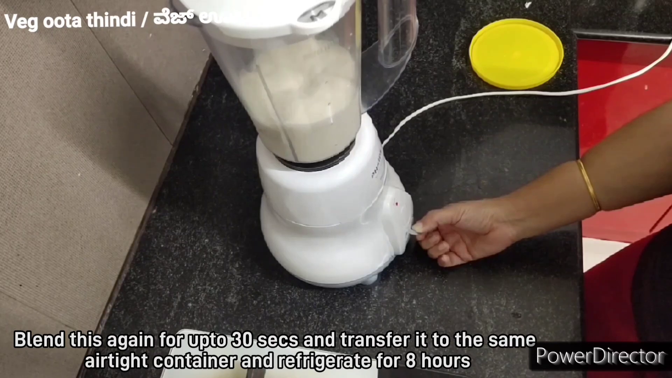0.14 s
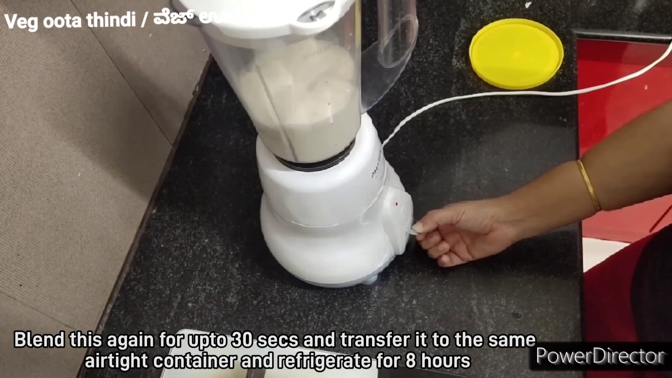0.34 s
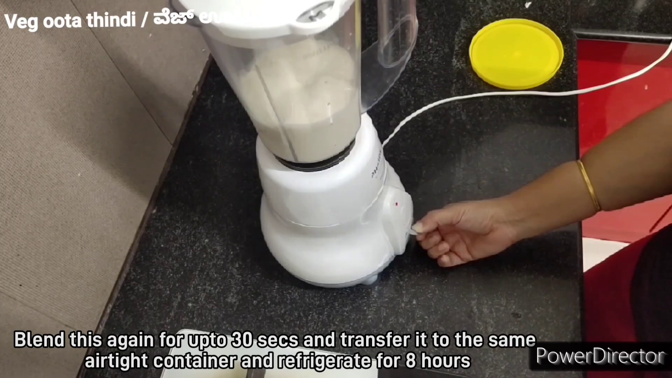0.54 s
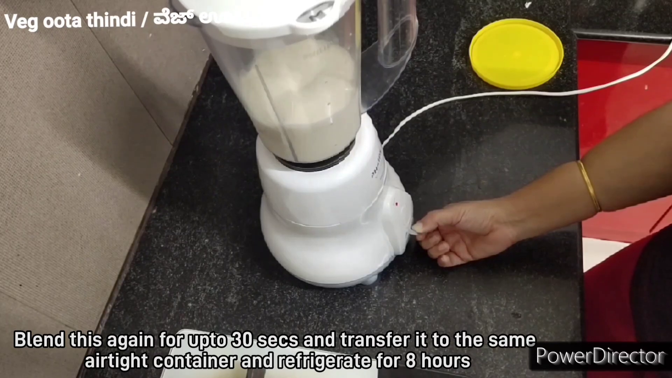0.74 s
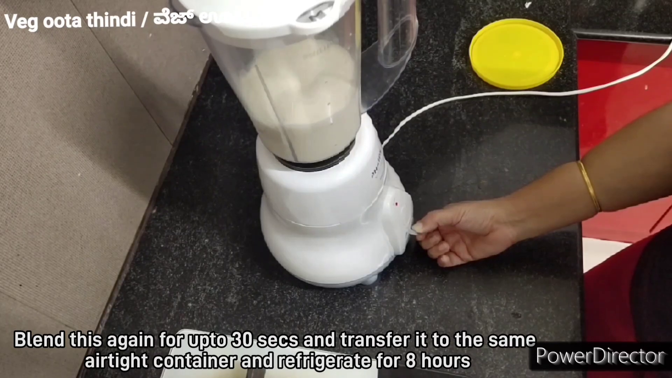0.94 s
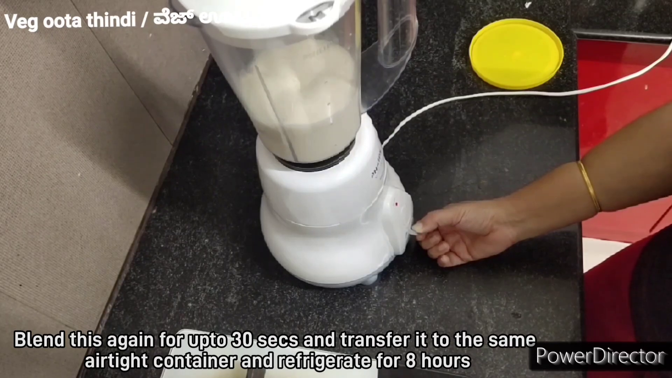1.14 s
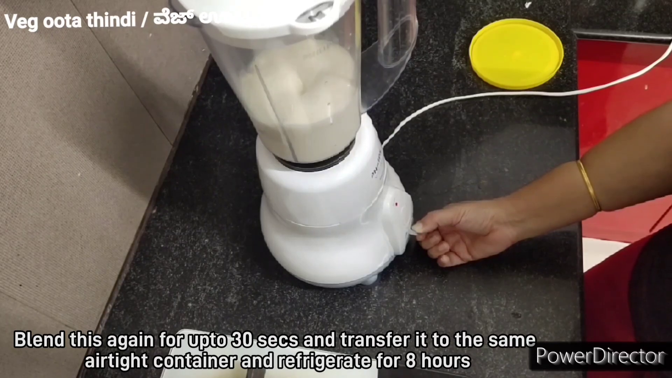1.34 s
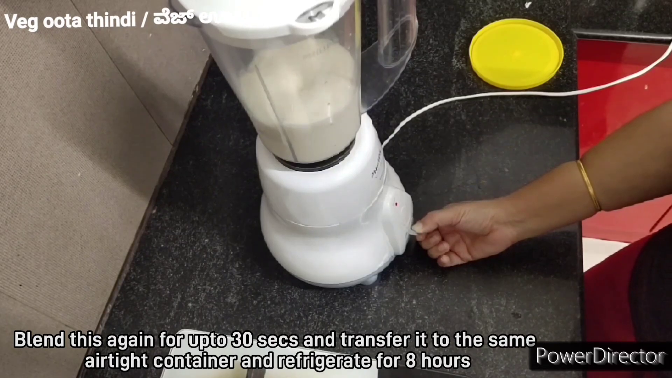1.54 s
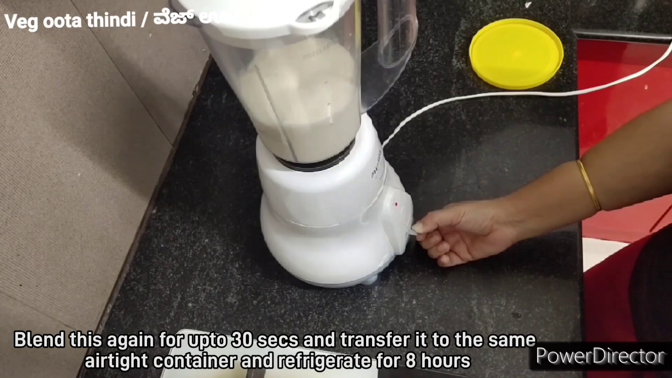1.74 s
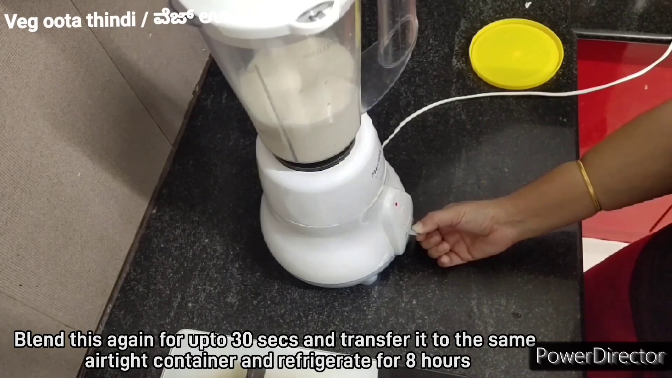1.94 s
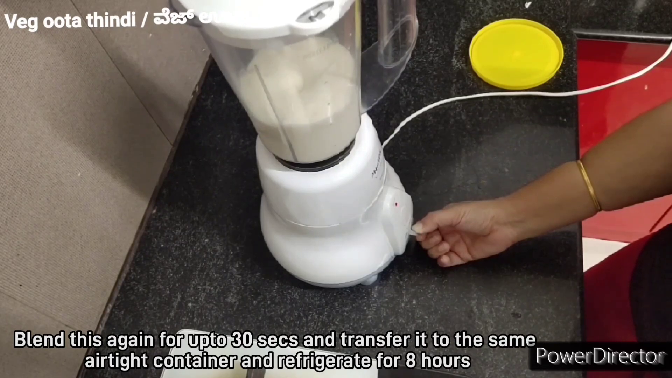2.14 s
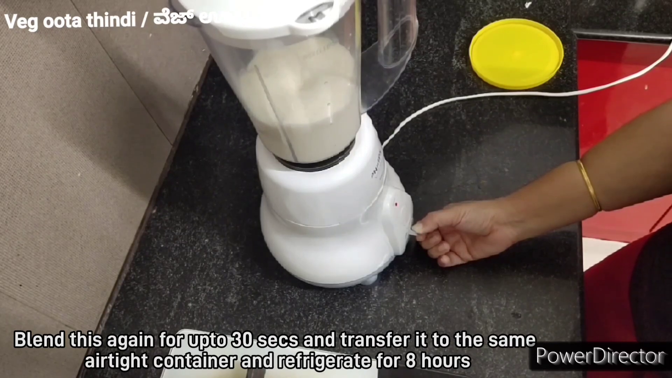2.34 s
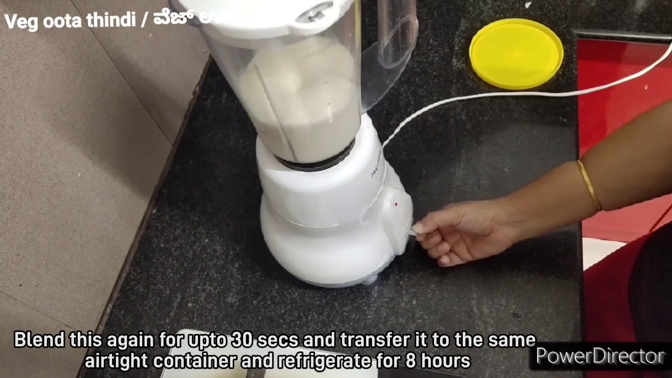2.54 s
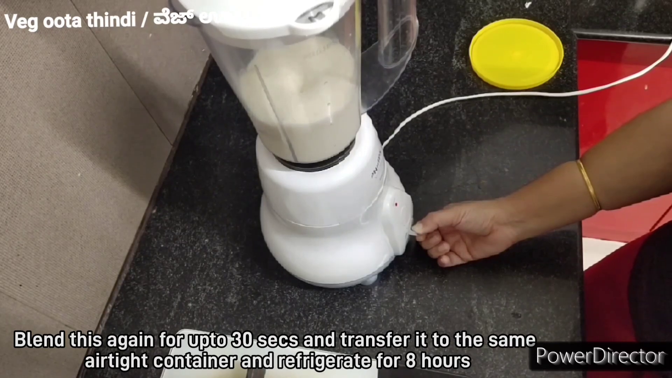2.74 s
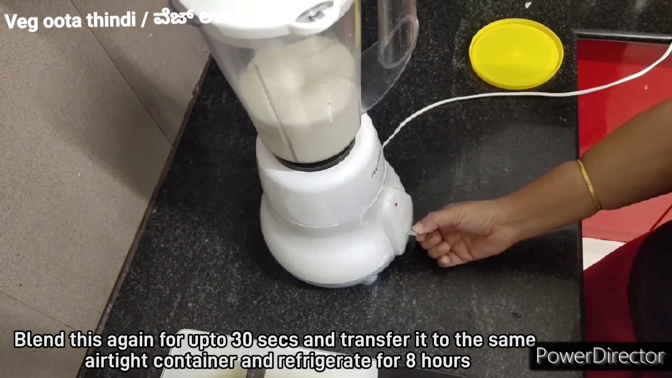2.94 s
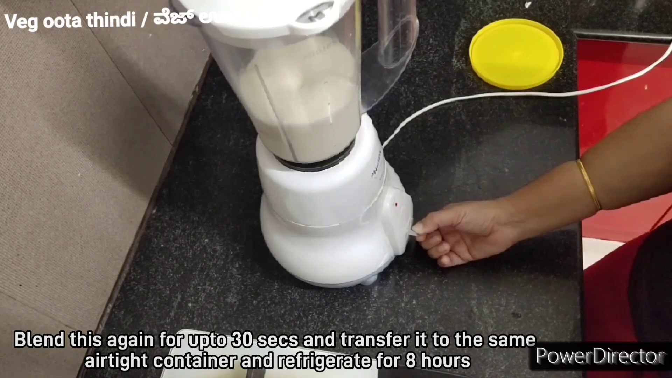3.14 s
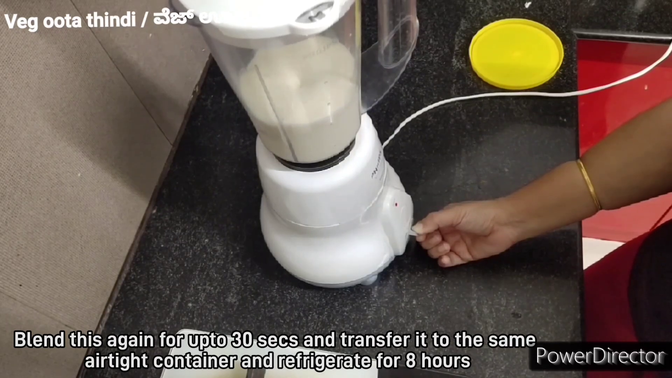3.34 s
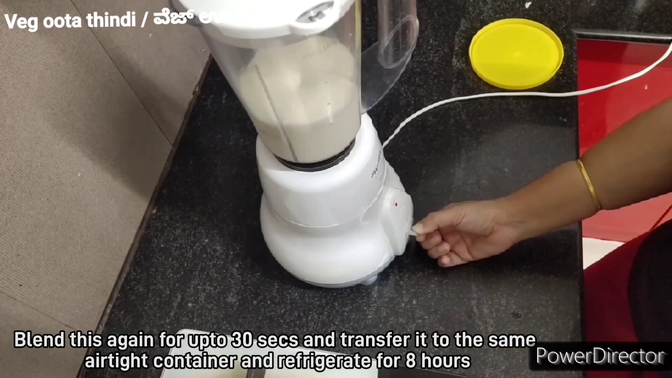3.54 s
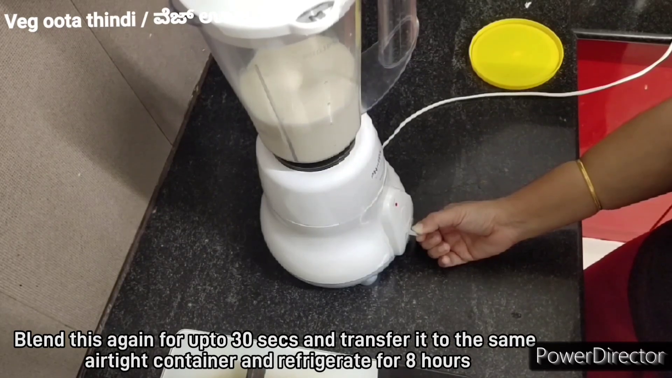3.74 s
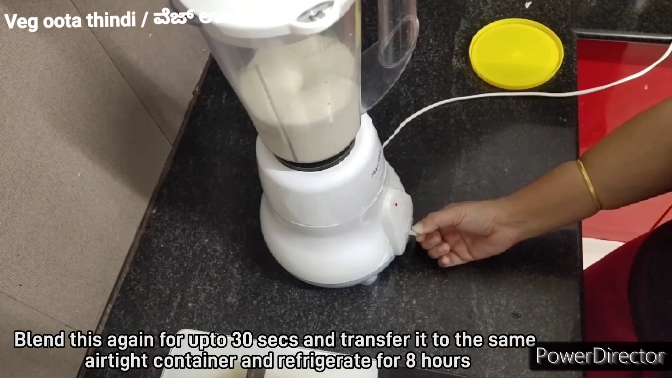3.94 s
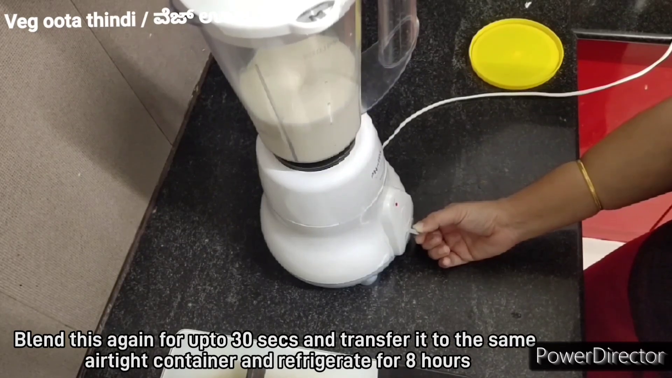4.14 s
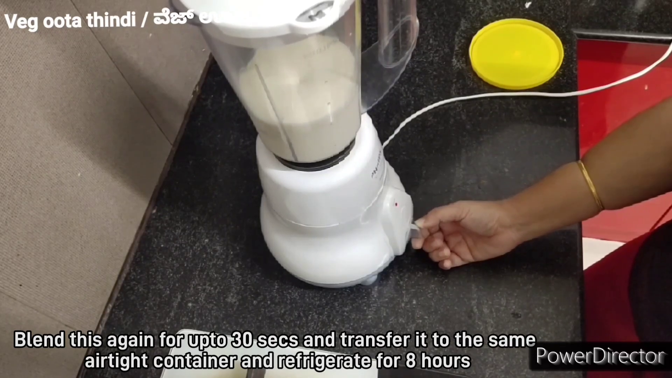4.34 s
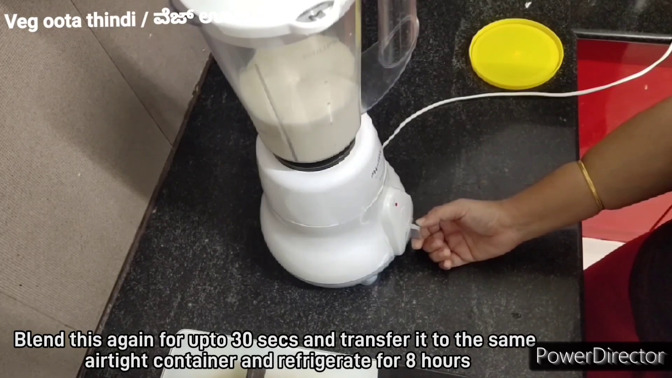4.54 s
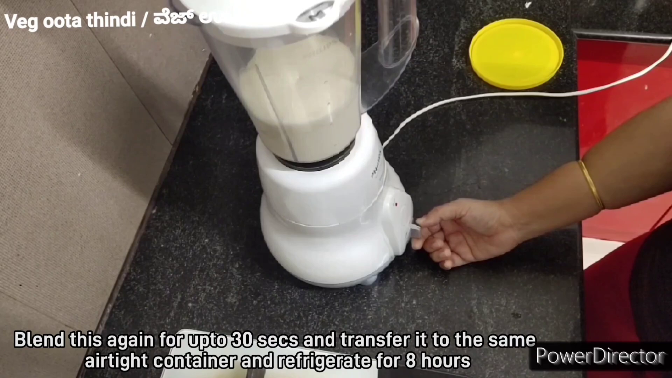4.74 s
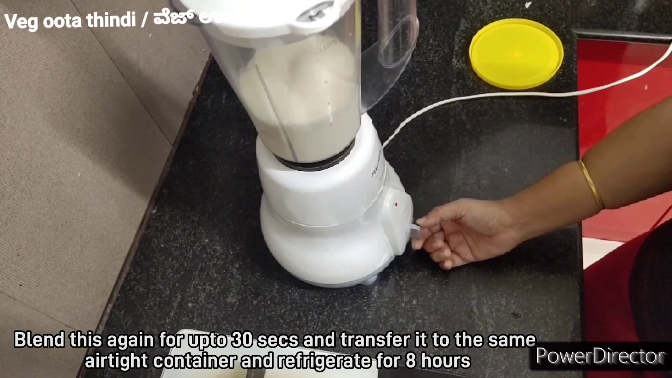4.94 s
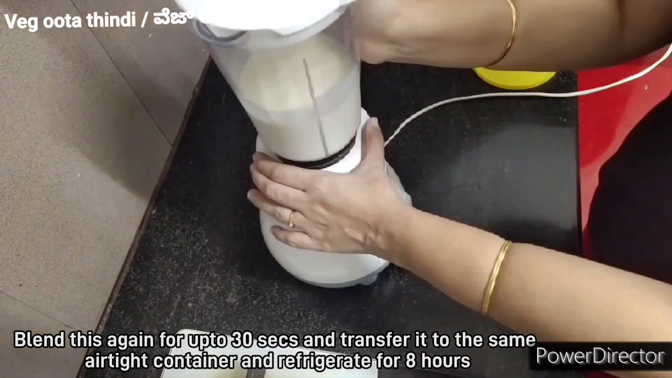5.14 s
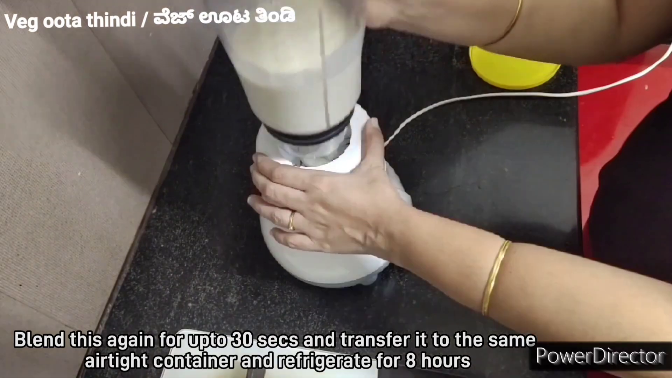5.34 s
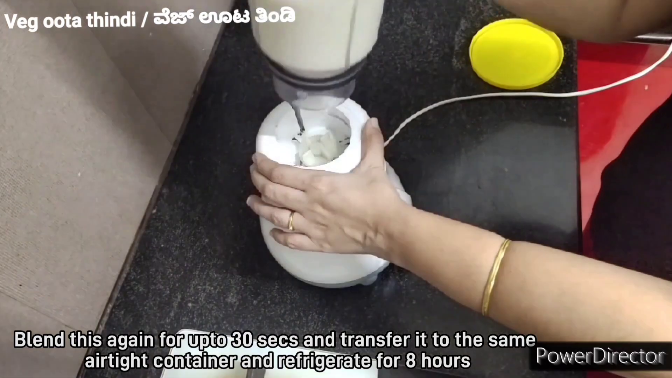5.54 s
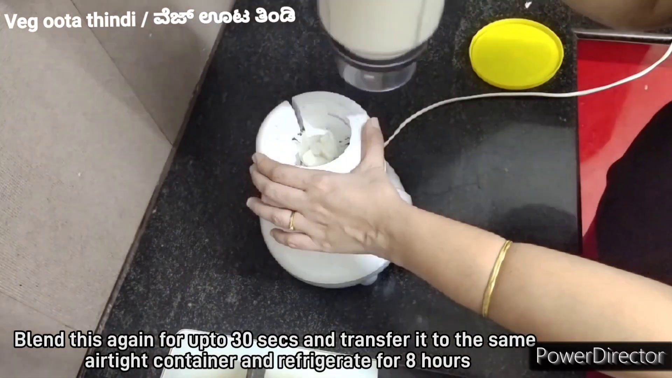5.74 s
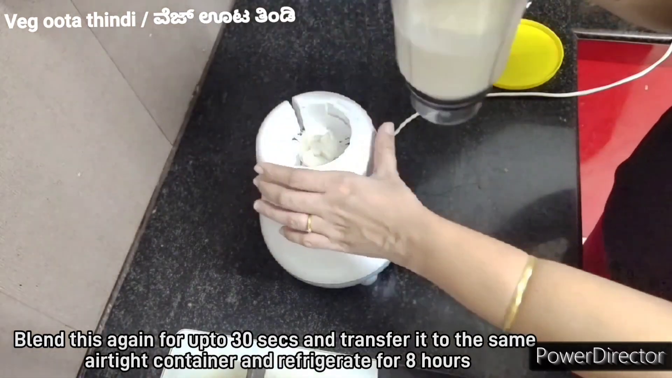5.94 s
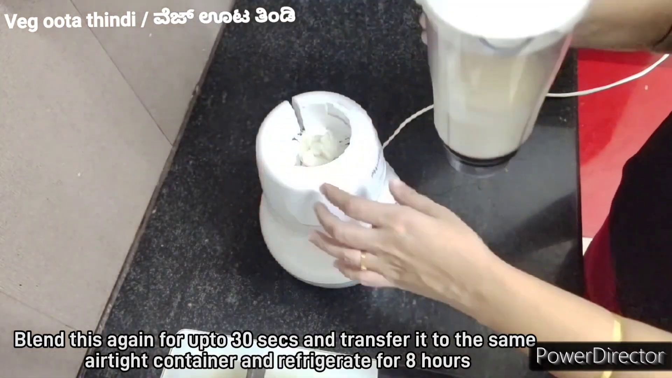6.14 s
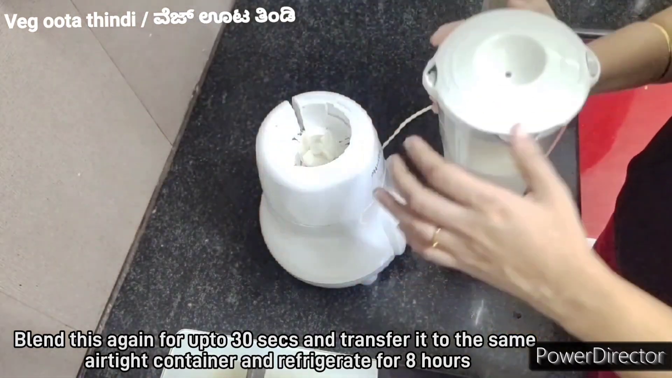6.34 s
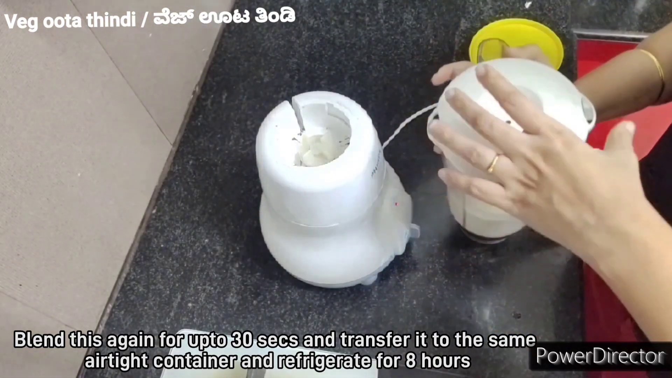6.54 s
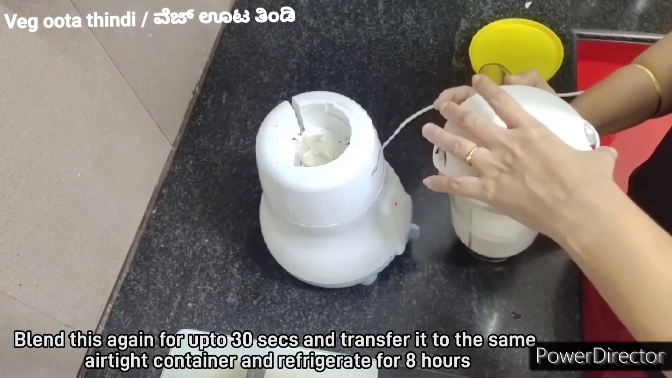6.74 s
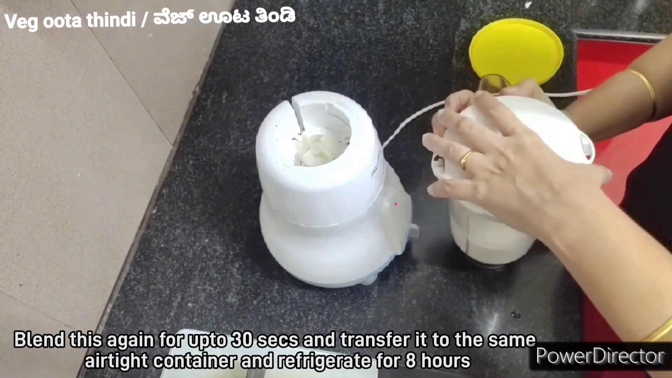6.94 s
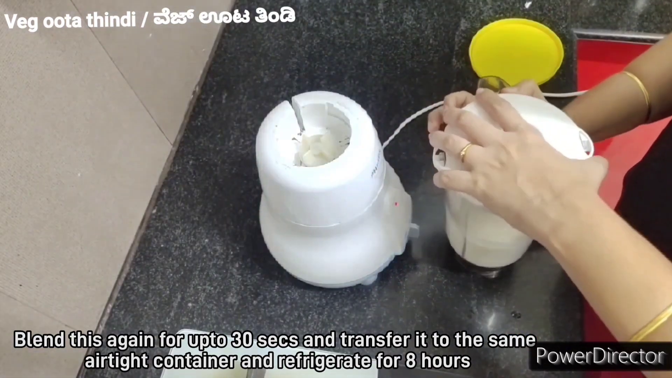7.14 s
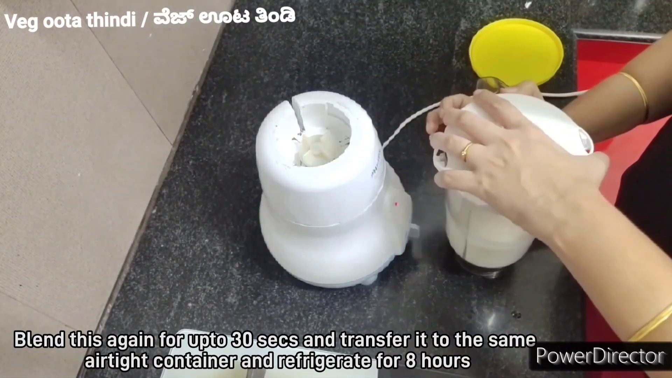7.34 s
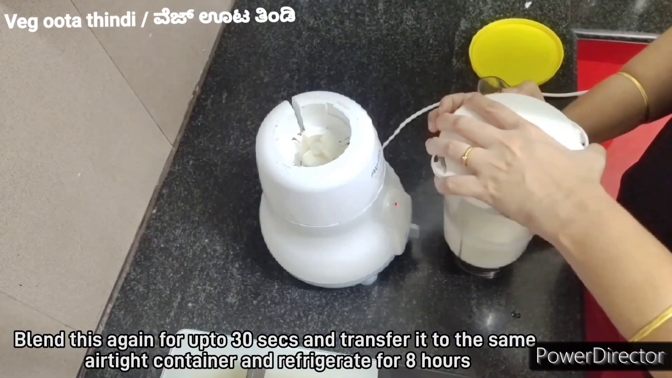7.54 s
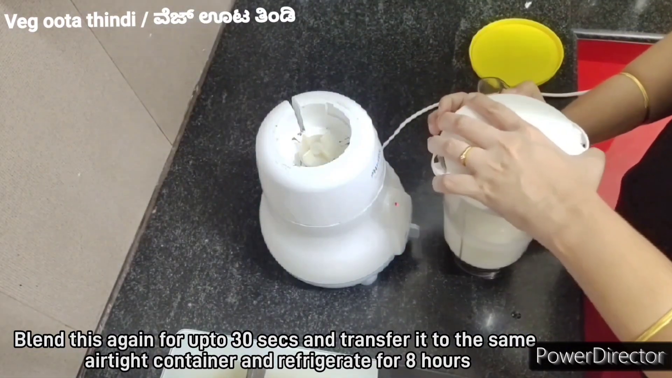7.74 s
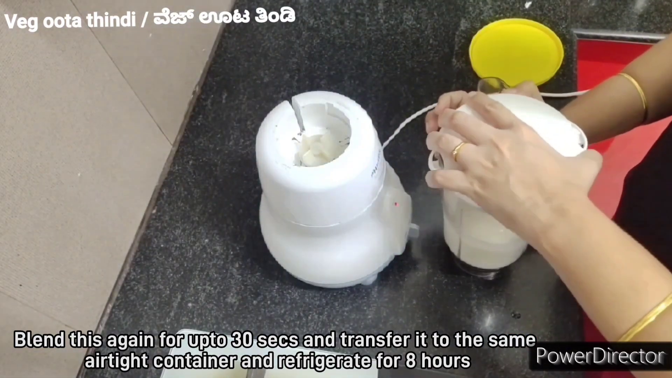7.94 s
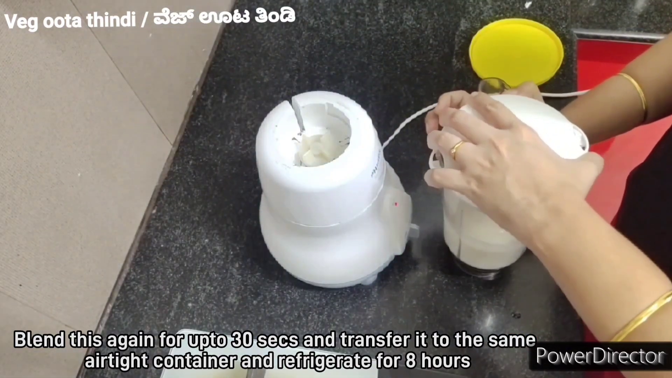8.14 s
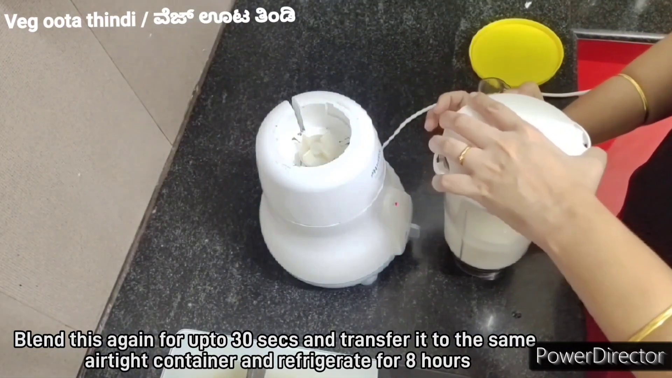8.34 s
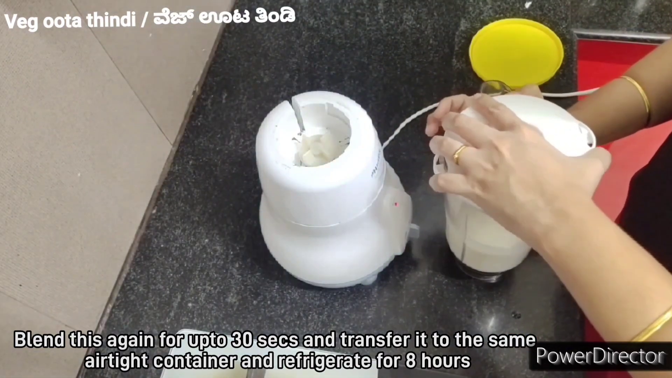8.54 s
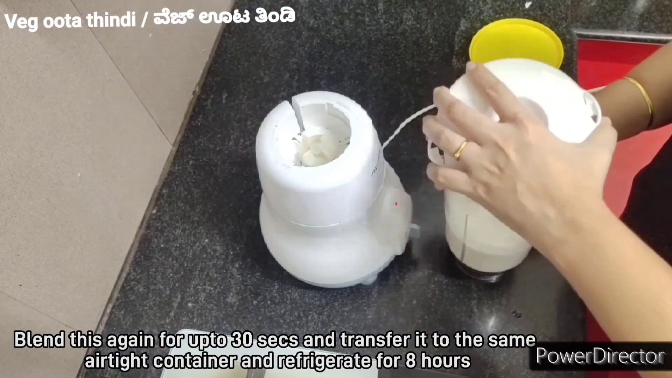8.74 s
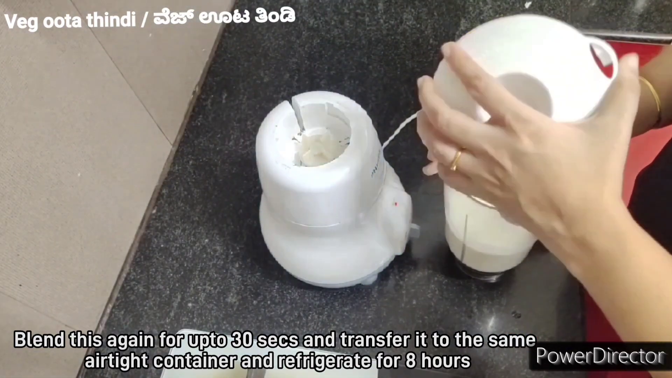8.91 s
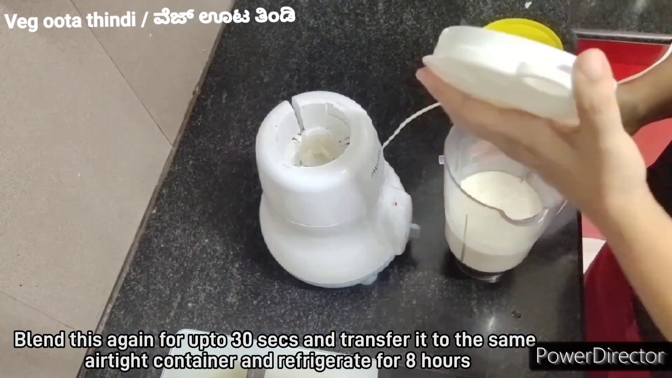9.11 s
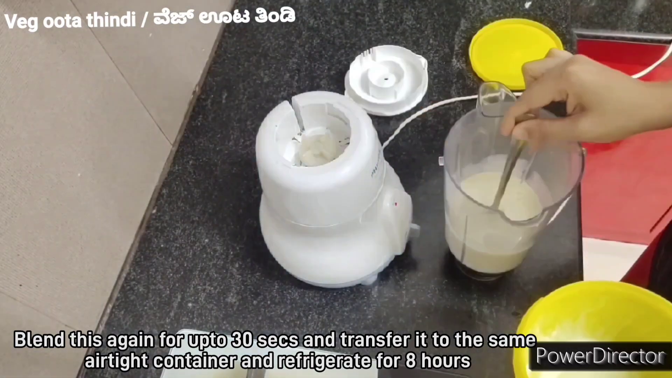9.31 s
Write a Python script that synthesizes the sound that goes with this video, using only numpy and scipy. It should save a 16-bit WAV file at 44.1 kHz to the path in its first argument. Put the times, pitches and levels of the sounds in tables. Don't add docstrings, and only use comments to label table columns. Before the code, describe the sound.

Loud blender motor steps up in pitch, switches off and runs down; afterwards quiet handling, hollow plastic thumps, clicks and small squeaks.

```python
import sys
import numpy as np
from scipy import signal
from scipy.fft import rfft, irfft, next_fast_len
from scipy.io import wavfile
from scipy.ndimage import uniform_filter1d, map_coordinates

SR = 44100
rng = np.random.default_rng(int(sys.argv[2]) if len(sys.argv) > 2 else 0)


def unload_audio(sound):
    columns = np.transpose(np.atleast_2d(sound))
    steps = np.round(np.clip(columns, -1, 1) * 32767)
    wavfile.write(sys.argv[1], SR, steps.astype(np.int16))


def gain_from_decibels(decibels):
    exponent = np.asarray(decibels, float) / 20
    return 10 ** exponent


N = 413254
TIME_S = np.arange(N) / SR
PORTS = np.array([[1], [-1]])
SCENE_CHANGE_S = 5.408


def unit(x):
    return x / np.sqrt(np.mean(x ** 2) + 1e-20)


def along(points, hz):
    f, v = np.transpose(points)
    return np.interp(np.log(hz + 1), np.log(f + 1), v)


def curves(rows, edge_s=0.034):
    s, *columns = np.transpose(rows)
    padded_s = np.r_[s[0] - edge_s, s, s[-1] + edge_s]
    out = []
    for c in columns:
        if c[0] < 0:
            out.append(np.interp(TIME_S, padded_s, np.r_[min(c[0], -120), c, min(c[-1], -120)]))
        else:
            out.append(np.interp(TIME_S, s, c))
    return out


def wobble(rate_hz):
    knots = rng.standard_normal(int(N * rate_hz / SR) + 4)
    return map_coordinates(knots, [np.arange(N) * rate_hz / SR])


def filtered(x, response):
    n = x.shape[-1]
    m = next_fast_len(n + 8192)
    return irfft(rfft(x, m) * response(np.fft.rfftfreq(m, 1 / SR)), m)[..., :n]


def modes(table):
    def response(f):
        total = 0
        for k, (hz, width_hz, db) in enumerate(sorted(table)):
            damping = 1j * f * width_hz
            total = total + (-1) ** k * gain_from_decibels(db) * damping / (hz * hz - f * f + damping)
        return total
    return response


def scattered(table, spread_db=5):
    return [(hz, width_hz, db + spread_db * rng.standard_normal()) for hz, width_hz, db in table]


# frequency in Hz, left-right likeness.
PORT_LIKENESS = [(60, 0.92), (120, 1), (240, 0.84), (480, 0.89), (950, 0.59), (1890, 0.65), (3770, 0.3),
                 (7520, 0.18), (15000, 0.5)]
# frequency in Hz, left minus right in dB.
PORT_LEAN = [(60, 0), (110, -0.5), (200, -1), (380, 5.5), (700, 1), (1290, -2), (2380, 0.5), (4400, 0.5),
             (8120, -1), (15000, 7.5)]


def rush(gain, gate=1, patchy_db=1.0, streak_db=0):
    z = signal.stft(rng.standard_normal((2, N)), nperseg=1024)[2]
    chance = rng.standard_normal(z.shape[1:])
    patches = uniform_filter1d(uniform_filter1d(chance, 3, 0), 6, 1)
    streaks = uniform_filter1d(chance[::-1], size=6, axis=1)
    uneven_db = np.clip(patchy_db, 0, 3) * unit(patches) + streak_db * unit(streaks)
    pair = gate * signal.istft(z * gain_from_decibels(uneven_db), nperseg=1024)[1][:, :N]

    def mid_side(hz):
        turn = np.arccos(np.clip(along(PORT_LIKENESS, hz), -1, 1)) / 2
        return gain(hz) * np.array([np.cos(turn), np.sin(turn)])
    mid, side = filtered(pair, mid_side)
    leaning = lambda hz: gain_from_decibels(np.outer([.5, -.5], along(PORT_LEAN, hz)))
    return unit(filtered(np.array([mid + side, mid - side]), leaning))


def tiles(x, echo_db=-10, colour=.15):
    delay_s = rng.uniform(.0005, .006, (2, 10, 1))
    sign = rng.choice([-1, 1], (2, 10, 1))

    def response(f):
        copies = (sign * np.exp(-2j * np.pi * f * delay_s)).sum(1)
        path = 1 + gain_from_decibels(echo_db) * copies / (1 + (450 / (f + 1)) ** 4)
        return path / (abs(path) + 0.08) ** (1 - colour)
    return filtered(x, response)


# level in dB over the unbalance, tilt in dB per Hz away from low speed.
LOW_ORDERS = [(0.5, 0), (-0.14, 0.0668), (0, -0.5863), (-10.5, -.5)]


def shaft_tones(speed_hz, unbalance_db, angle):
    low_speed_hz, stumble_s, spread_s, stumble_rad = 115, 2.39, .15, .9
    lean_db, lead_rad = 0.8, 0.099
    stumble = stumble_rad * np.exp(-((TIME_S - stumble_s) / spread_s) ** 4) * wobble(30)
    out = 0
    for k, (db, tilt) in enumerate(LOW_ORDERS, 1):
        level_db = unbalance_db + db + tilt * abs(speed_hz - low_speed_hz) + 0.47 * k * wobble(15)
        phase = k * (angle + stumble) + k * k + PORTS * lead_rad * k
        out = out + gain_from_decibels(level_db + PORTS * lean_db * (k - 0.8)) * np.sin(phase)
    return out


# multiple of shaft speed, level in dB.
WHINE_ORDERS = [(5, -53), (6, -42.5), (7, -51), (8, -48), (9, -46.5), (11, -48.5), (14, -55), (16, -49.5),
                (18, -53), (19, -46), (20, -47.5), (23, -53), (24, -50), (27, -53.5)]


def whine(angle, load_db):
    def one_port():
        out = 0
        for k, db in WHINE_ORDERS:
            level_db = db - 2.5 + load_db + 3.6 * wobble(11)
            out = out + gain_from_decibels(level_db) * np.sin(k * angle + 1.4 * wobble(20))
        return out
    return np.array([one_port() for port in range(2)])


# frequency in Hz, width in Hz, level in dB.
JAR_SLOW_MODES = [(215.6, 19, 1), (220.7, 11, 0.5), (297.6, 17, -0.5), (430.4, 12, -4), (525, 83, -9.5),
                  (587, 18, -4.5), (636, 45, -4.5), (690, 38, -2), (744, 28, -1), (820, 40, -1),
                  (870, 61, -8), (945, 90, -12), (1016, 40, -8), (1043, 22, -4), (1150, 45, -4),
                  (1223, 35, -4.5), (1270, 37, -2), (1388, 100, -9)]
JAR_FAST_MODES = [(164, 30, -10), (215, 22, -3.5), (293, 18, -1), (411, 110, -9.5), (515, 73, -7),
                  (640.5, 102.4, -2), (760, 118, -2), (852, 130, -4.5), (1044.5, 33, -5), (1120, 40, -6),
                  (1163, 25, -4), (1214.4, 30, 0.5), (1266, 30, -1), (1352, 82, -7.5), (1445, 30, -6)]
JAR_COAST_MODES = [(137, 24.8, -17.5), (221, 14, 5), (289.5, 6.4, 4), (426, 45, -3), (620, 50, -3),
                   (747, 70, -5), (1135, 39, 4), (1264, 50, 3.5)]


def churning(speed_hz, throb, load_db, surge_db):
    level_db = -27 + load_db + surge_db
    fast = np.clip((np.maximum.accumulate(speed_hz) - 118) / 14, 0, 1)
    slow_jar = rush(modes(JAR_SLOW_MODES), throb, patchy_db=.5, streak_db=1.5)
    fast_jar = rush(modes(JAR_FAST_MODES), throb, patchy_db=.5, streak_db=1.5)
    powered = gain_from_decibels(level_db) * (np.sqrt(1 - fast) * slow_jar + np.sqrt(fast) * fast_jar)
    switch_off_s = 4.75
    coast = np.clip((TIME_S - switch_off_s) / 0.49, 0, 1)
    coasting = gain_from_decibels(level_db + 1.5) * rush(modes(JAR_COAST_MODES))
    return np.sqrt(1 - coast) * powered + np.sqrt(coast) * coasting


# frequency in Hz, density in dB per Hz.
FAN_AIR = [(760, -30.5), (1300, -10), (1570, -6), (2020, -5), (3000, -5.5), (3630, -7.5), (3950, -10.5),
           (4310, -13), (5600, -29), (7280, -54.5), (12300, -120)]
# frequency in Hz, width in Hz, level in dB.
VENT_MODES = [(1732, 21, 0.5), (1880, 25, 0), (2045, 34, 1.5), (2076, 28, -4), (2200, 30, -2),
              (2368, 25, 0), (2576, 74, -4), (2818, 23, 2), (3217, 70, -3.5), (3658, 60, 0),
              (4190, 52, 2.5), (4440, 34, 2), (4715, 50, 3.5), (5100, 32, 9.5)]


def cooling_fan(throb, load_db, surge_db):
    vented = lambda hz: gain_from_decibels(along(FAN_AIR, hz)) * (.85 + abs(modes(VENT_MODES)(hz)))
    return gain_from_decibels(-28.5 + 0.95 * load_db + surge_db) * rush(vented, throb, patchy_db=.5, streak_db=3.3)


# frequency in Hz, density in dB per Hz.
FIZZ_COLOUR = [(2650, -54), (4500, -22.5), (5210, -6.5), (5670, -9), (7220, -7.5), (10200, -11.5),
               (10800, -11), (11700, -11), (12100, -16.5), (14900, -15), (15800, -33.5)]
WHISTLE_COLOUR = [(9500, -40), (11500, -1), (14500, 0), (15800, -9.5)]


def fizz(throb, load_db, surge_db, off):
    fizz_db = -44 + 2.5 * np.clip(TIME_S / 2.1, 0, 1) + 1.2 * load_db
    brush_noise = gain_from_decibels(fizz_db + surge_db) * rush(lambda hz: gain_from_decibels(along(FIZZ_COLOUR, hz)), throb, streak_db=2)
    whistle = rush(lambda hz: gain_from_decibels(along(WHISTLE_COLOUR, hz)))
    return brush_noise + off * gain_from_decibels(-66 + .5 * load_db) * whistle


# frequency in Hz, width in Hz, level in dB.
SLAB_MODES = [(42, 13, -12.5), (97, 13, 4), (140, 39, -4.5), (214.7, 20, -11), (286, 10, -14.5)]
# frequency in Hz, width in Hz, level in dB.
FEET_MODES = [(44, 18, 0)]
VORTEX_S = (2.0, 2.4, 3.3, 3.7)


def counter_shake(unbalance_db, load_db, off):
    excess_db = unbalance_db - SHAFT_RUN[0][2]
    vortex_db = np.interp(TIME_S, VORTEX_S, [0, 8.5, 8.5, 4.25])
    powered_db = -58.5 + .2 * excess_db + vortex_db
    coasting_db = -42 + 0.45 * load_db
    slab = gain_from_decibels((1 - off) * powered_db + off * coasting_db) * rush(modes(SLAB_MODES))
    rock = gain_from_decibels(-72.5 + 1.4 * excess_db) * rush(modes(FEET_MODES))
    return slab + (TIME_S > VORTEX_S[1]) * rock


def rattle(angle, load_db, off):
    pulses = unit(np.exp(45 * (np.cos(angle) - 1)))
    jolts = off * gain_from_decibels(0.82 * load_db + 1.6 * wobble(23)) * pulses
    return gain_from_decibels(-27.5) * filtered(jolts, modes(JAR_COAST_MODES))


# time in seconds, shaft speed in Hz, unbalance in dB.
SHAFT_RUN = [(0.0, 114.5, -40), (1.72, 117.2, -38), (1.81, 127.6, -39), (1.9, 136.4, -33.5),
             (2.17, 136.5, -33), (2.31, 130, -39.5), (2.47, 133, -38), (2.56, 135.3, -34),
             (3.14, 135.3, -35), (3.27, 136.4, -34), (3.5, 145.6, -31), (4.29, 141.8, -31),
             (4.55, 156, -37.5), (4.63, 144, -37), (4.83, 86, -40), (4.95, 74, -54), (5.2, 38, -72),
             (5.4, 8.9, -85)]


def motor():
    power_cut_s, cut_hz, coast_power = 4.6, 157.7, 1.83
    speed_hz, unbalance_db = curves(SHAFT_RUN)
    off = np.clip((TIME_S - power_cut_s) / 0.2, 0, 1)
    slowing_db = 20 * np.log10(np.clip(speed_hz / cut_hz, 1e-3, 1))
    load_db = (TIME_S > power_cut_s) * coast_power * slowing_db
    angle = 2 * np.pi * np.cumsum(speed_hz + 0.396 * wobble(25)) / SR
    tones = shaft_tones(speed_hz, unbalance_db, angle) + whine(angle, load_db)
    throb = (1 + .33 * np.cos(angle) + .14 * np.cos(2 * angle)) * gain_from_decibels(.8 * wobble(350))
    surge_db = 0.16 * wobble(9) + 0.89 * wobble(30) + off * 0.64 * wobble(14)
    noise = churning(speed_hz, throb, load_db, surge_db) + cooling_fan(throb, load_db, surge_db)
    noise = noise + fizz(throb, load_db, surge_db, off) + rattle(angle, load_db, off)
    return np.sqrt(2) * tones + tiles(noise) + counter_shake(unbalance_db, load_db, off)


# start in seconds, length in seconds, frequency in Hz, level in dB, unsteadiness in rad.
SQUEAK_EVENTS = [(5.64, .035, 2540, -57, .5), (7.74, .08, 2000, -80, 1.5), (7.26, .12, 2800, -59, 1.5),
                 (8.36, .11, 2220, -71, 1.5), (5.71, .18, 480, -63.5, 1.2), (5.68, .14, 385, -70, 1.4),
                 (5.74, .1, 1270, -74, 2), (4.75, .16, 294, -42, .8), (4.99, .22, 215, -52, .8),
                 (6.13, .2, 1450, -74, .9), (6.24, .11, 960, -74, .8), (6.15, .12, 860, -77, 1.2),
                 (5.55, .07, 1040, -68, 1.5), (5.62, .08, 1020, -62, 2), (5.63, .06, 1270, -66, 2),
                 (5.48, .08, 1100, -74, 2.5), (6.36, .75, 3260, -79, 2), (6.69, .2, 3270, -76, 2.2),
                 (8.37, .07, 1400, -70, 2), (9.16, .06, 1090, -75, 1.5), (9.18, .08, 1350, -78, 2),
                 (8.853, .02, 2000, -70, 1), (8.835, .03, 3050, -68, 1), (6.2, .17, 2530, -77, 2.5),
                 (6.03, .06, 670, -74, 4), (6.42, .08, 640, -77, 4), (7.0, .06, 600, -76, 5),
                 (6.75, .08, 2330, -79, 2), (6.65, .1, 2780, -85, 3), (9.02, .03, 2300, -60, 1.5),
                 (9.055, .045, 2250, -67, 1.2), (9.1, .1, 2300, -76, 2), (7.75, .07, 3600, -84, .8),
                 (9.23, .09, 2880, -78, 1.5)]


def squeaks():
    out = 0
    for s, length_s, hz, db, shaky_rad in SQUEAK_EVENTS:
        swell = np.sqrt(abs(np.sin(np.pi * np.clip((TIME_S - s) / length_s, 0, 1))))
        level = gain_from_decibels(db - 2 + 2 * wobble(35))
        out = out + level * swell * np.sin(2 * np.pi * hz * TIME_S + shaky_rad * wobble(40))
    return np.sqrt(2) * out


# start in seconds, level in dB.
BRUSH_EVENTS = [(4.7782, -36), (4.8307, -38), (4.8826, -35), (4.9165, -36), (4.9894, -31), (5.0328, -40),
                (5.0911, -47), (5.1245, -47), (5.1625, -44), (5.2098, -46), (5.2717, -53), (5.3855, -62)]
# frequency in Hz, width in Hz, level in dB.
BRUSH_MODES = [(1170, 130, 2), (1930, 220, -2.5), (2450, 230, -4), (3630, 90, 1), (4400, 92, -1),
               (4650, 90, -3)]


def brushes():
    width_s = 0.013
    bursts = 0
    for s, db in BRUSH_EVENTS:
        bursts = bursts + gain_from_decibels(db - 5) * np.exp(-((TIME_S - s - width_s) / width_s) ** 2)
    return bursts * rush(modes(BRUSH_MODES))


# time in seconds, level in dB.
ARMS_BUSY = [(5.3, -68), (5.38, -69.5), (5.72, -70.5), (6.3, -70), (7.05, -73), (7.24, -70), (7.42, -62),
             (7.48, -71), (7.53, -54), (7.66, -72.5), (8.2, -82), (8.4, -66), (8.55, -79), (8.69, -65),
             (8.82, -70), (9.0, -72), (9.37, -76)]
# frequency in Hz, density in dB per Hz.
MURMUR_COLOUR = [(110, -28), (170, -15), (550, -6.5), (900, -13.5), (2700, -15.5), (3700, -24.5),
                 (6000, -31), (9000, -68.5)]
# frequency in Hz, density in dB per Hz.
HISS_COLOUR = [(2060, -39.5), (3500, -7.5), (5830, -8.5), (7120, -2.5), (7670, -6), (10000, -10),
               (15500, -12.5)]
# time in seconds, level in dB.
HISS_LEVEL = [(5.3, -84), (5.41, -76), (5.43, -87), (5.47, -78), (6.0, -81), (6.83, -82.5), (7.28, -76),
              (7.45, -70), (7.62, -85), (7.8, -79), (7.95, -78.5), (8.2, -99), (8.38, -80), (8.54, -84),
              (8.7, -86), (8.95, -77), (9.2, -85), (9.37, -81)]


def air():
    murmur = rush(lambda hz: gain_from_decibels(along(MURMUR_COLOUR, hz)), patchy_db=6.5, streak_db=2.5)
    murmur = gain_from_decibels(curves(ARMS_BUSY)[0] + 1.6 * wobble(8.4)) * murmur
    hiss = rush(lambda hz: gain_from_decibels(along(HISS_COLOUR, hz)), patchy_db=3.0)
    return murmur + gain_from_decibels(curves(HISS_LEVEL)[0] + 1.5) * hiss


def hand_lumps():
    body = modes([(64.7, 19, -6.0), (92, 18, -3.0), (147, 59, -11.0)])
    return gain_from_decibels(curves(ARMS_BUSY)[0] + 7) * rush(body, gain_from_decibels(2.5 * wobble(18)))


# frequency in Hz, t60 in seconds.
KITCHEN_T60 = [(100, 0.72), (400, 0.44), (1500, 0.41), (4000, 0.38), (10000, 0.29)]


def kitchen(x):
    hz, t, z = signal.stft(rng.standard_normal((2, int(.6 * SR))), SR, nperseg=256)
    decay = gain_from_decibels(-60 * t / np.maximum(along(KITCHEN_T60, hz), .05)[:, None])
    tail = signal.istft(z * decay, SR, nperseg=256)[1]
    both = tail.mean(0)
    near = lambda f: 1 / (1 + (f / 500) ** 2)
    tail = filtered(tail, lambda f: 1 - near(f)) + np.sqrt(2) * filtered(both, near)
    return signal.fftconvolve(x[None], tail / np.linalg.norm(tail[0]), axes=1)[:, :len(x)]


# time in seconds, counter thump in dB, hollow shell in dB, edge clack in dB, catch tick in dB.
BLOWS = [(5.461, -72, -75.5, -59, -80), (5.54, -59, -75, -63, -49), (5.644, -55, -48, -41.5, -39.5),
         (7.255, -26.5, -14, -31.5, -39.5), (7.526, -29, -23, -29, -49), (7.877, -31.5, -41, -47.5, -48),
         (7.883, -65, -25.5, -22.5, -26), (8.241, -46, -62, -70, -74), (8.279, -58, -76, -72, -83),
         (8.344, -44.5, -40, -63, -70), (8.358, -57, -39, -51, -45.5), (8.509, -50.5, -74.5, -79, -84.5),
         (8.622, -44, -38.5, -38, -43), (8.781, -36.5, -54, -66, -62), (8.809, -42, -47, -60, -58),
         (8.822, -50, -52, -62, -60), (8.847, -56, -54, -62, -62), (8.831, -43.5, -50, -61, -55),
         (8.794, -51, -40, -58, -60), (8.904, -42, -63, -72, -68), (9.018, -53, -47, -55, -48),
         (9.034, -60, -46, -58, -56)]
# frequency in Hz, width in Hz, level in dB.
THUMP_MODES = [(90.6, 29, 0), (178, 42, 6)]
SHELL_MODES = [(326, 42, 4), (510, 170, -2.5), (714, 105, 8.5), (850, 260, -8.5)]
LOOSE_SHELL_MODES = [(243, 96, -4.5), (480, 180, -1.5), (670, 95, 5), (900, 250, -5)]
CLACK_MODES = [(1590, 210, 1), (2170, 1300, -2.5), (2834, 170, 8.5), (3250, 200, 1), (3860, 960, -12)]
LOOSE_CLACK_MODES = [(1050, 270, -8), (1480, 180, -1.5), (1900, 330, 0), (2300, 250, 2.5), (2710, 200, 1),
                     (3270, 250, -2.5), (4200, 580, -8.5)]
TICK_MODES = [(5000, 2000, -7.5), (6600, 360, 2), (7300, 1100, -5.5), (12070, 3700, -17)]
JAR_HUM_MODES = [(212, 7, -5), (323, 6, -1), (361, 10, 0), (432, 9, -11), (570, 7, -13), (650, 7, 1),
                 (700, 6, -2), (756, 8, 0), (825, 7, -10), (969, 9, -13)]
RIM_MODES = [(1520, 14, -3), (1760, 12, -4), (2336, 10, -3), (2610, 8, 0), (2730, 9, -2), (2820, 8, 0),
             (2970, 9, -4), (3295, 11, -4)]
# frequency in Hz, level in dB.
WALL_COLOUR = [(90, 4), (180, -2.5), (320, 4), (700, 1), (950, 4.5), (1300, 5), (2800, 2), (8000, 1.5)]


def knocks():
    loose_s, lifted_s = 7.8, 8.5
    out = np.zeros((2, N + SR))
    t = np.arange(int(.6 * SR)) / SR
    push = np.exp(-t / 0.0014)
    snap = (t == 0) * 1.
    peaked = lambda x: x / np.max(abs(x))
    thump, tight, loose = [filtered(push, modes(m)) for m in (THUMP_MODES, SHELL_MODES, LOOSE_SHELL_MODES)]

    def gripped(table):
        return [(hz * (1 + .015 * rng.standard_normal()), width_hz, db) for hz, width_hz, db in table]

    for s, *part_db in BLOWS:
        shell, edge = (tight, CLACK_MODES) if s < loose_s else (loose, LOOSE_CLACK_MODES)
        chatter = np.exp(-(t / 0.0033) ** 2) * rng.standard_normal(len(t))
        small_parts = [gripped(edge), gripped(TICK_MODES)]

        def struck(hit):
            parts = [thump, shell] + [filtered(hit, modes(m)) for m in small_parts]
            return sum(gain_from_decibels(db) * peaked(p) for p, db in zip(parts, part_db))
        late = np.pad(struck(snap), (180, 0))[:len(t)]
        back = kitchen(filtered(late, lambda hz: gain_from_decibels(along(WALL_COLOUR, hz))))
        hum = filtered(push, modes(scattered(JAR_HUM_MODES)))
        rim = filtered(chatter, modes(scattered(RIM_MODES)))
        blow = struck(chatter) + gain_from_decibels(-7 * (s > lifted_s)) * back
        blow = blow + gain_from_decibels(part_db[1] - 11) * peaked(hum) + gain_from_decibels(part_db[2] - 17) * peaked(rim)
        out[:, round((s + .0015) * SR):][:, :len(t)] += blow
    return out[:, :N]


# peak in seconds, 20 dB rise in seconds, 20 dB fall in seconds, rub in dB, gasket hiss in dB.
RUB_STROKES = [(5.472, .015, .15, -72, -84), (5.548, .012, 0.13, -61, -53), (5.61, .06, .04, -60, -66),
               (5.655, 0.012, 0.1, -55, -59), (6.28, 0.07, 0.15, -66.5, -80), (6.345, 0.06, 0.07, -67, -82),
               (6.5, .15, .2, -74, -92), (6.8, .1, .1, -75, -88), (7.3, 0.04, 0.3, -59, -68),
               (7.52, 0.13, 0.1, -51, -43), (7.536, 0.015, 0.04, -45.5, -55.5), (7.875, .01, 0.2, -48, -50),
               (8.25, .012, .08, -71, -86), (8.352, .01, .1, -58, -63), (8.615, .06, .05, -68, -78),
               (8.69, .08, .1, -70, -76), (8.79, .045, 0.04, -58, -52), (8.812, .03, .03, -58, -57),
               (8.835, .03, .04, -58, -55), (8.91, 0.1, .1, -69, -71), (8.985, .1, .05, -68, -68),
               (9.022, .02, .04, -55, -58), (9.036, .025, .04, -55, -57), (9.056, .025, .05, -59, -60),
               (9.12, .06, 0.2, -65, -73)]


def rubs():
    gains = 0
    for s, rise_s, fall_s, rub_db, hiss_db in RUB_STROKES:
        drop_db = 20 * np.maximum((s - TIME_S) / rise_s, (TIME_S - s) / fall_s)
        gains = gains + gain_from_decibels(np.array([[rub_db], [hiss_db]]) - drop_db)
    sliding, hissing = gains
    grain = gain_from_decibels(1.3 * wobble(300) + 1.3 * wobble(40))
    plastic = modes([(1240, 1600, -7.5), (2310, 570, -1.5), (3250, 890, -6.0)])
    gasket = modes([(5300, 3000, -15.0), (7700, 900, -1.0), (8160, 760, -1.5), (11440, 5700, -16.5),
                    (14700, 1500, -14.5)])
    return sliding * rush(plastic, grain, patchy_db=7.5) + hissing * rush(gasket, grain, patchy_db=5.5)


def scene():
    since_s = TIME_S - SCENE_CHANGE_S
    running = np.clip(-since_s / 0.0031, 0, 1)
    machine = running * (motor() + brushes())
    room = np.maximum(running, np.clip(since_s / 0.056, .45, 1)) * air()
    return machine + squeaks() + room + hand_lumps() + knocks() + rubs()


# frequency in Hz, margin in dB.
LINE_MARGIN = [(4000, -30), (8000, -2.5), (10000, 1), (15000, 2.5)]
# frequency in Hz, threshold in spreads.
BAND_DROPOUT = [(8500, -2.2), (9500, -.5), (11000, .5), (12300, .6), (13300, .8), (14000, .5), (14700, 0),
                (15300, 1.1)]


def thin_treble(x):
    lead, top_hz, loud_db = 791, 15480, -32
    easy_db, easy_margin_db = -46, -4.5
    eases = .09
    pair = np.pad([x[0] + x[1], x[0] - x[1]], ((0, 0), (lead, 0))) / 2
    hz, _, z = signal.stft(pair, SR, window="cosine", nperseg=2048)
    power = abs(z) ** 2
    around = uniform_filter1d(power, size=48, axis=1)
    frame_power = power.sum((0, 1))
    chance = rng.standard_normal((2, len(hz) // 16 + 1, z.shape[2]))
    chance = unit(uniform_filter1d(chance, size=2, axis=2))
    chance = np.repeat(chance, 16, axis=1)[:, :len(hz)]
    dropout = np.where(hz > 8000, along(BAND_DROPOUT, hz) - [[0], [.35]], -9)[..., None]
    under_db = np.clip(loud_db - 10 * np.log10(frame_power + 1e-12), 0, 30)
    band_kept = chance > dropout - eases * under_db
    easy = frame_power < gain_from_decibels(easy_db) ** 2
    margin_db = along(LINE_MARGIN, hz)[:, None] + easy_margin_db * easy
    line_kept = power > around * gain_from_decibels(margin_db) ** 2
    kept = (easy | band_kept) & line_kept & (hz < top_hz)[:, None]
    mid, side = signal.istft(z * kept, SR, window="cosine", nperseg=2048)[1][:, lead:lead + N]
    return np.array([mid + side, mid - side])


def top_cut(x):
    return signal.sosfilt(signal.butter(12, 16060, fs=SR, output="sos"), x)


def record(dry):
    mix = thin_treble(dry)
    return top_cut(mix)


dry = scene()
out = record(dry)
unload_audio(out)
```